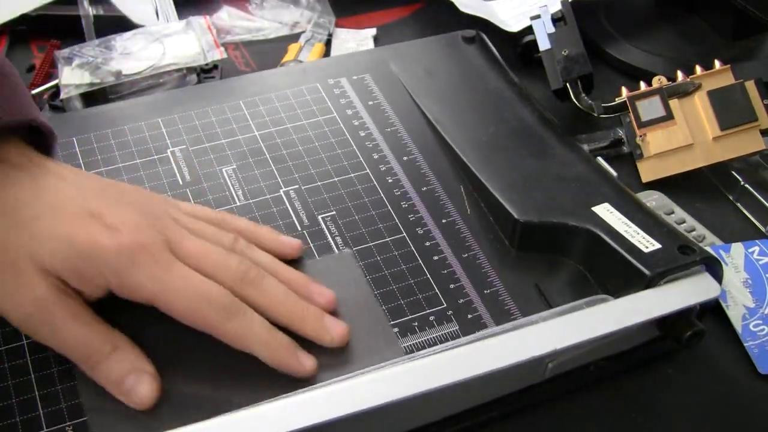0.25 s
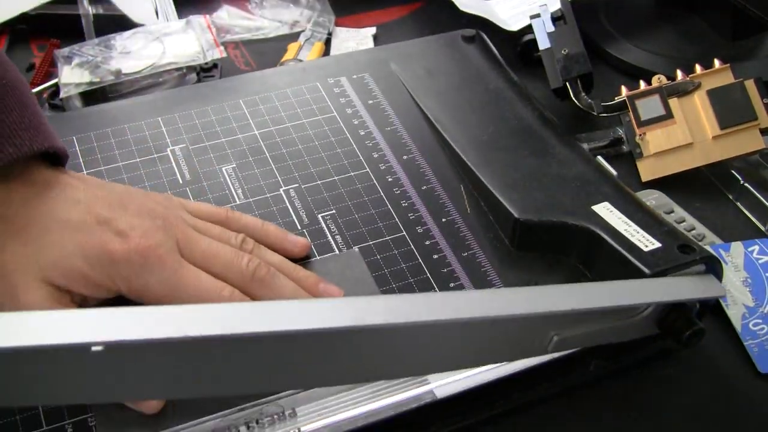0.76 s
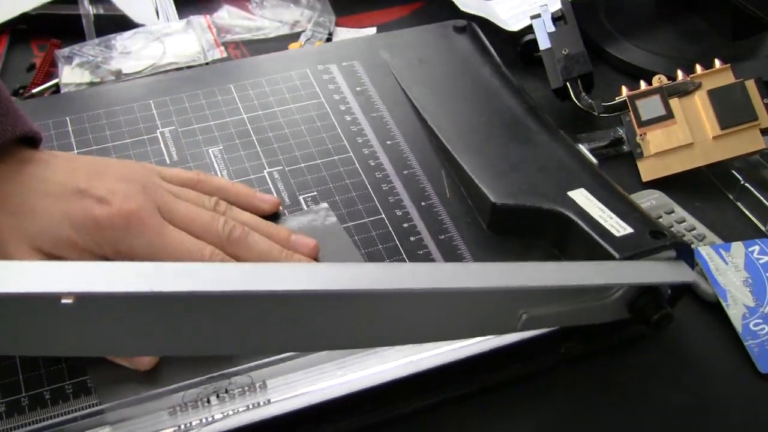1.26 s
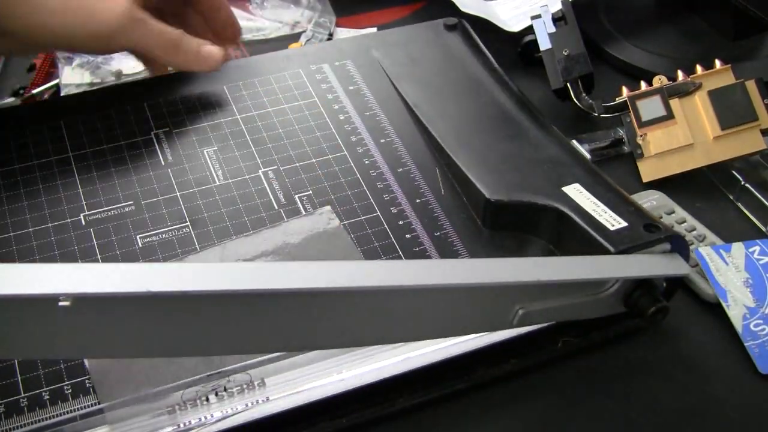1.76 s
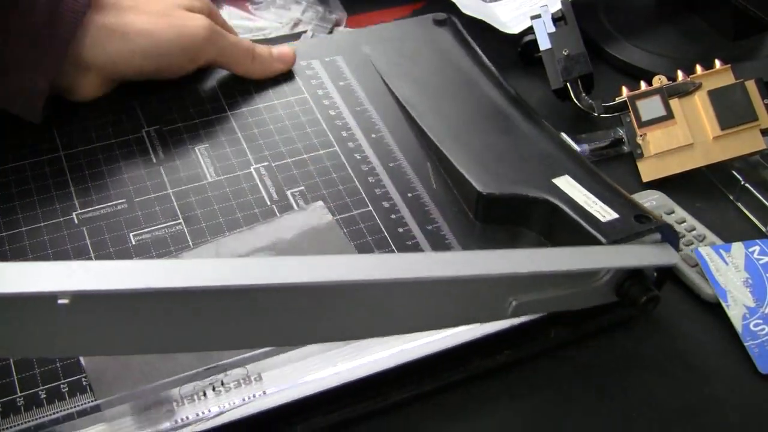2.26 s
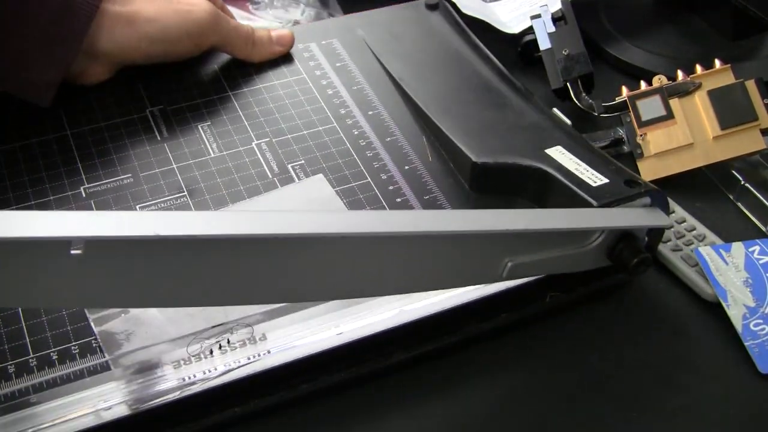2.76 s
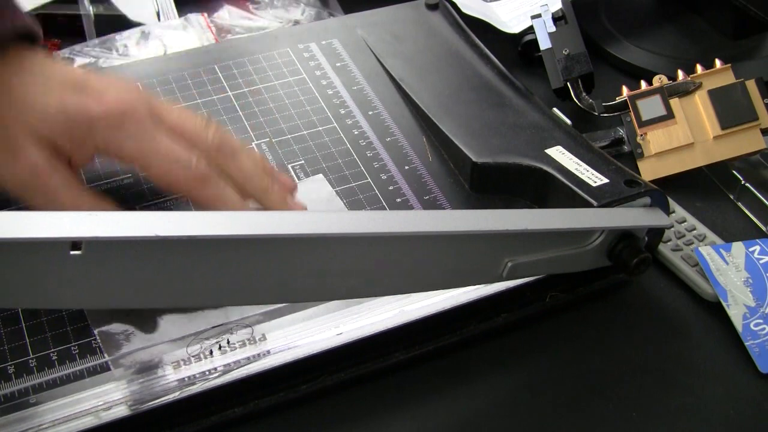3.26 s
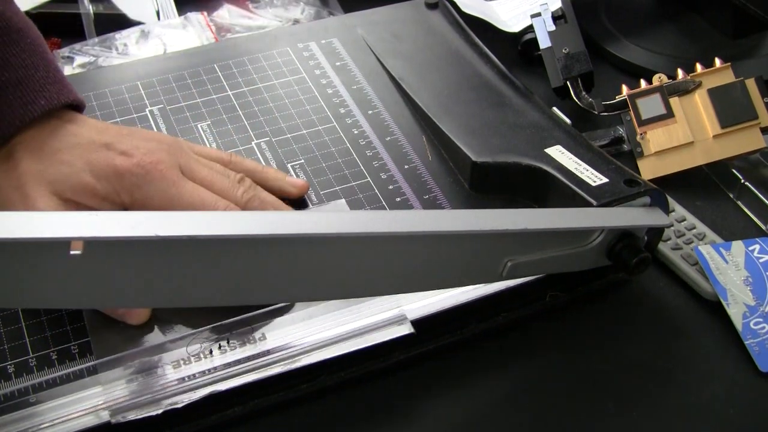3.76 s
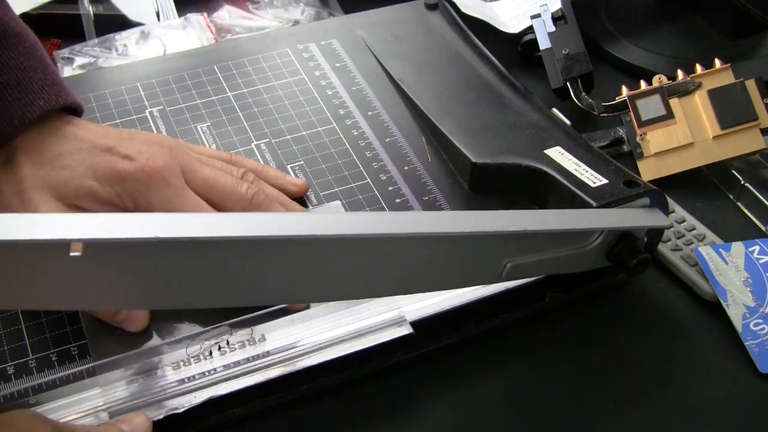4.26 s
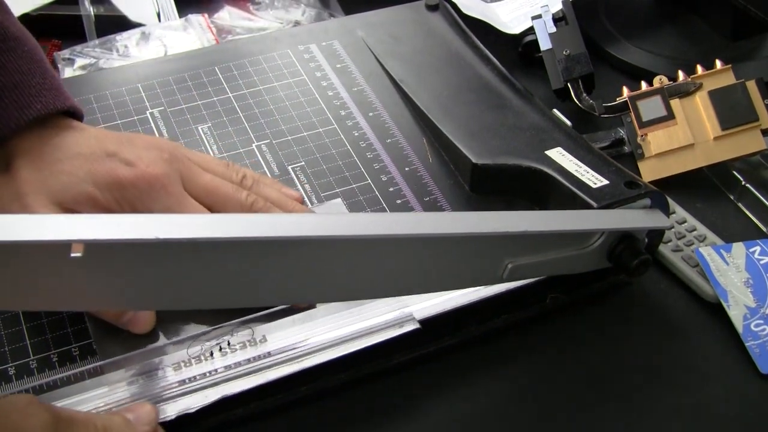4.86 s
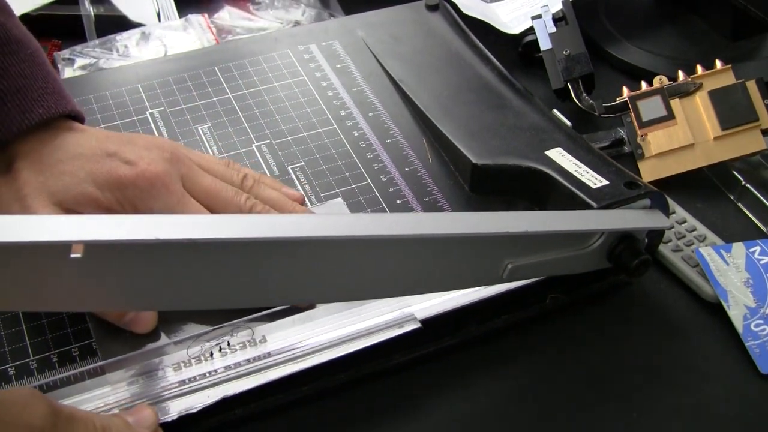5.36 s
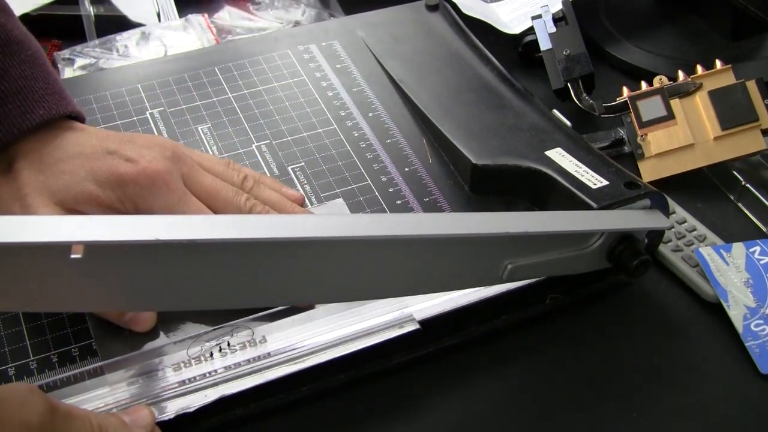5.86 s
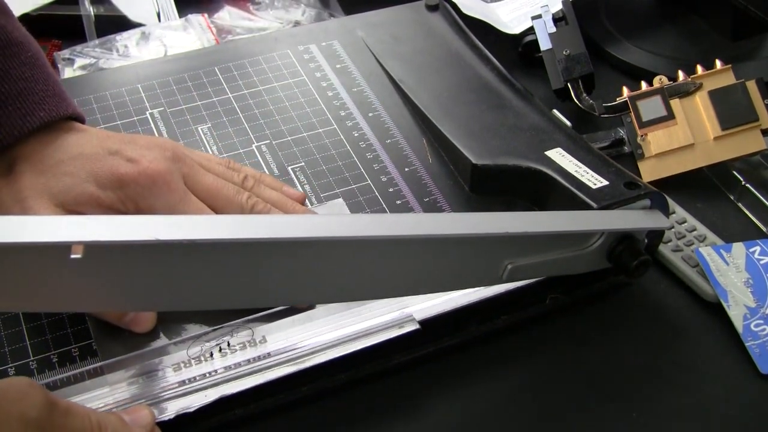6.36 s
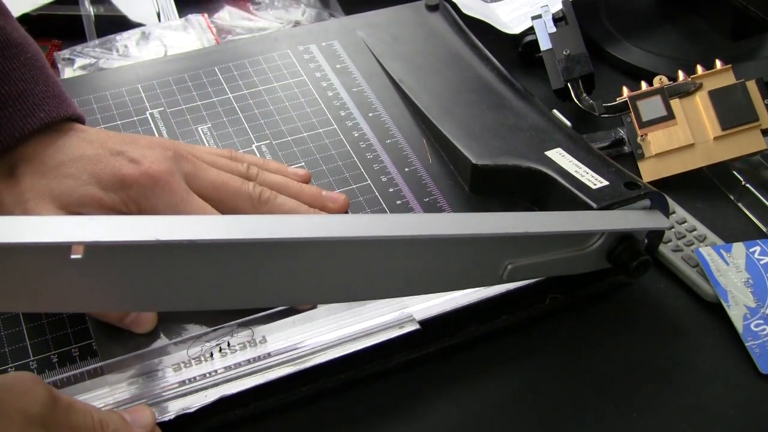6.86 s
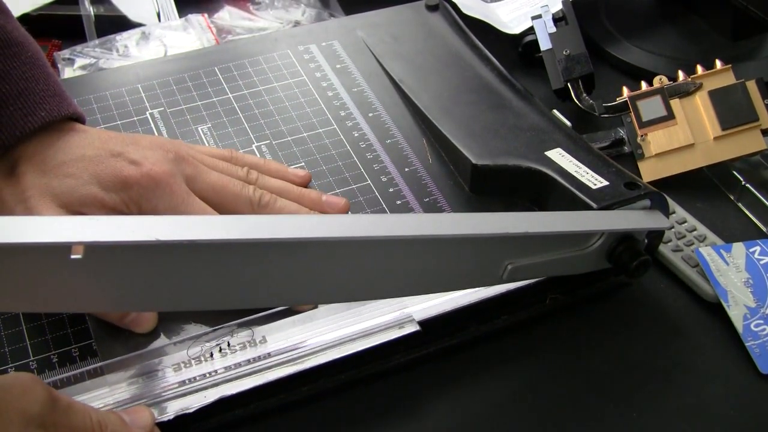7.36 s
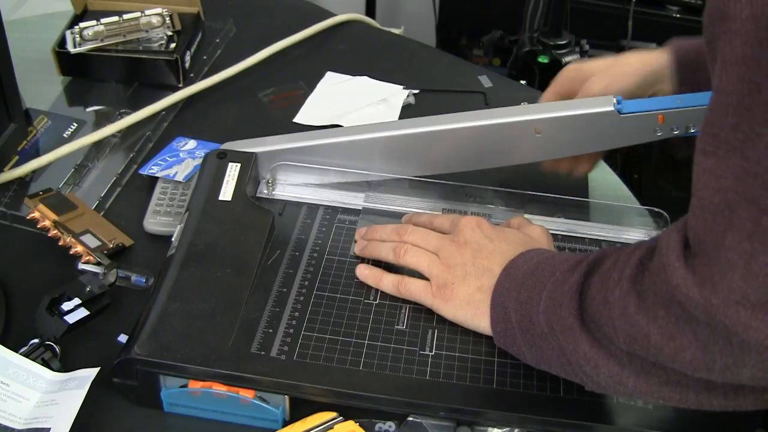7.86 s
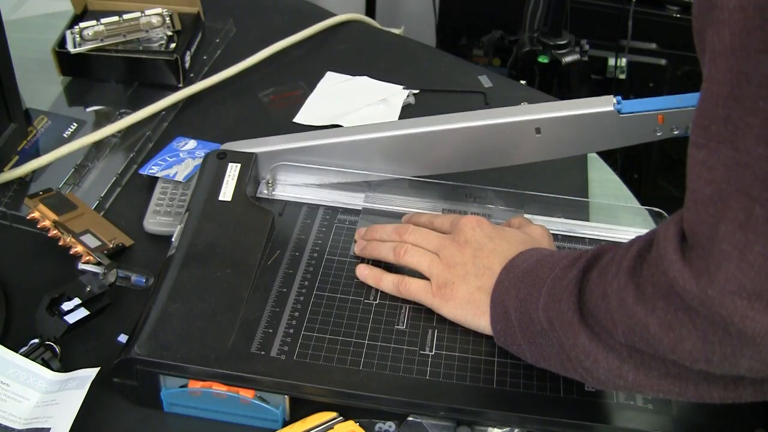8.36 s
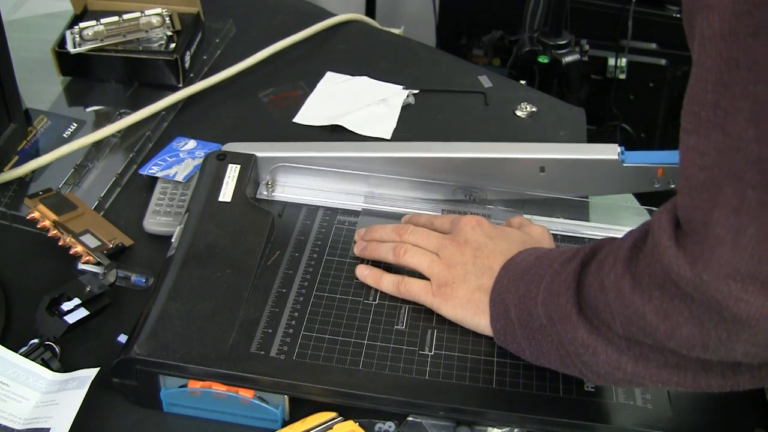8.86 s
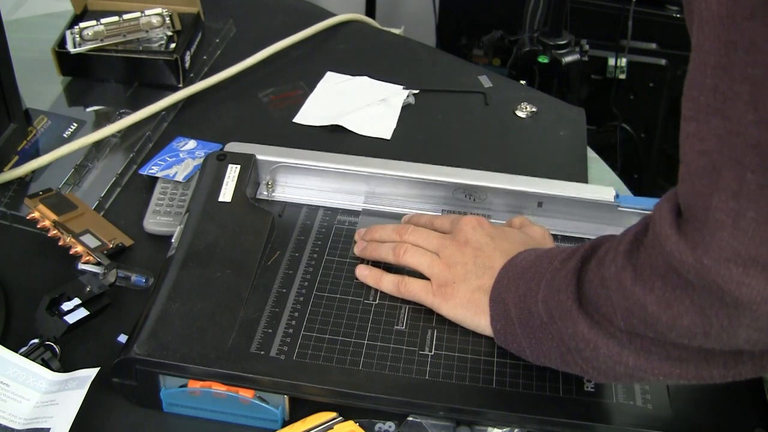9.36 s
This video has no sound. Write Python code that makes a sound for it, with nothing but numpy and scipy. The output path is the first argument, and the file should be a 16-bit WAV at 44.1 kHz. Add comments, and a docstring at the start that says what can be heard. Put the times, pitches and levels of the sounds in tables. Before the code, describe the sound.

Irregular boxy thuds, short rubbing slides and bright clicks come from a paper trimmer being set up on a workbench, heard closely with a short room tail. The steel arm scrapes and clacks. Several seconds of almost nothing follow, just low mains buzz and steady soft hiss. A few light knocks precede the blade crunching through the pad, ending with a rumbling scrape.

```python
"""Knocks, sliding and the clacks of a steel arm, a quiet spell, then a crunching cut and a final scrape.
A hand slides a soft pad onto a lever-arm paper trimmer, knocks its plastic deck and shifts the machine.
Blows ring the modes of deck and arm; sliding and cutting are crowds of tiny random slips, coloured by
the parts they shake. Mains hum, buzz and a steady hiss run underneath, in a small dry room."""
import sys
import numpy as np
from scipy import signal
from scipy.fft import rfft, irfft, next_fast_len
from scipy.io import wavfile

SR = 44100
rng = np.random.default_rng(int(sys.argv[2]) if len(sys.argv) > 2 else 0)


def unload_audio(sound):
    """Save the sound as a 16-bit wav file, at the path given as the first command line argument."""
    columns = np.transpose(np.atleast_2d(sound))
    # keep every value between -1 and 1, then stretch to whole-number steps
    steps = np.round(np.clip(columns, -1, 1) * 32767)
    wavfile.write(sys.argv[1], SR, steps.astype(np.int16))


N = 423801
T = np.arange(N) / SR  # time [s]
AGE = T[:SR // 2]  # time since a blow [s]

# All levels in the tables are relative: each sound is scaled again when it is mixed.
# ringing modes of the hollow plastic deck: (frequency [Hz], level [dB], time to fall 60 dB [s])
DECK_MODES = [(131.5, -12.5, 0.18), (218, -29.5, 0.082), (280, -3.5, 0.092), (323.4, 2.5, 0.035),
              (404, 5, 0.071), (487, -17, 0.065), (512.6, 3, 0.07), (577.5, -1.5, 0.051),
              (697, -8.5, 0.099), (811, -8, 0.0595), (987, -13, 0.054), (1105, -19.5, 0.1),
              (1353, -20, 0.046)]
# low resonances of the loaded blade: (frequency [Hz], width [Hz], level [dB])
BLADE_DRONE = [(594.5, 26, 1), (645, 22.3, 2), (735, 78, -2.5), (847, 33, 2), (994, 47, -4), (1170, 80, -6),
               (1254, 69, -9.5)]
# colour of the body shaken by steel or by the cut: (frequency [Hz], level [dB])
CRUNCH_COLOUR = [(50, -29), (90, -35.5), (130, -11), (172, -23.5), (222, -7), (250, -13), (292, -6),
                 (340, -14.5), (410, -1.5), (475, -1), (625, -13), (900, -17.5), (3000, -63.5)]
# colour of rubbing on a surface: (frequency [Hz], level [dB])
RASP_COLOUR = [(400, -8), (1100, 7), (1700, 5), (2600, 2), (3700, 0.5), (4600, -10), (6500, -25),
               (14000, -39)]
# bites of the blade into the pad, each lasting until the next: (time [s], shake of the deck [dB])
BITES = [(9.083, -7), (9.143, -8.5), (9.224, -10)]
CUT_END_S = 9.392


def amp(db):
    """Turn decibels into a gain."""
    return 10 ** (np.asarray(db) / 20)


def unit(x):
    """Scale to an rms (average strength) of 1."""
    return x / np.sqrt(np.mean(x ** 2) + 1e-20)


def along(points, hz):
    """Read a curve of (frequency [Hz], value) points on a log frequency axis."""
    f, v = np.transpose(points)
    return np.interp(np.log(hz + 1), np.log(f + 1), v)


def filtered(x, response):
    """Multiply the spectrum of x by a response, which is a function of frequency."""
    m = next_fast_len(len(x) + SR // 4)  # spare room for the filter to ring out
    spectrum = rfft(x, m) * response(np.fft.rfftfreq(m, 1 / SR))
    return irfft(spectrum, m)[:len(x)]


def coloured(x, spectrum):
    """Give x a colour, a curve of (frequency [Hz], level [dB]), at rms 1."""
    return unit(filtered(x, lambda hz: amp(along(spectrum, hz))))


def resonant(x, peaks):
    """Send x through (frequency [Hz], width [Hz], level [dB]) resonances, at rms 1."""
    def response(f):
        total = 0
        for k, (centre, width, db) in enumerate(peaks):
            damping = 1j * f * width
            sign = (-1) ** k  # neighbours have opposite signs
            total = total + sign * amp(db) * damping / (centre * centre - f * f + damping)
        return total
    return unit(filtered(x, response))


def without_bass(x, corner_hz):
    """Take away the deepest bass, below corner_hz."""
    return signal.sosfilt(signal.butter(4, corner_hz, "highpass", fs=SR, output="sos"), x)


def blow(x, size=660):
    """Scale a blow so that its first moments (size samples) have rms 1."""
    return x / np.sqrt(np.mean(x[:size] ** 2) + 1e-20)


def ring(modes, scatter_db, attack):
    """A struck body sounds as fading sine modes; each blow excites them a little differently."""
    hz, db, t60 = np.transpose(modes)[:, :, None]
    level = amp(db + scatter_db * rng.standard_normal(hz.shape) - 60 * AGE / t60)
    waves = np.sin(2 * np.pi * (hz * AGE + rng.random(hz.shape)))
    onset = 1 - np.exp(-AGE / attack)
    return blow((level * waves).sum(0) * onset)


def burst(spectrum, t60):
    """Crowded small modes that die together sound like a fading puff of coloured noise."""
    return blow(coloured(rng.standard_normal(len(AGE)), spectrum) * amp(-60 * AGE / t60))


def add(track, s, x):
    """Mix x into the track at time s."""
    part = track[round(s * SR):][:len(x)]
    part += x[:len(part)]  # a view, so the track itself changes


def grains(rate, spread_db):
    """Tiny slips at random moments, rate times a second on average, of widely varying size."""
    happens = rng.random(N) < rate / SR
    direction = rng.choice([-1, 1], N)
    size = amp(spread_db * np.clip(rng.standard_normal(N), -2, 2))
    return unit(happens * direction * size)


def clumps(rate, depth_db):
    """A jerky gain: the material holds and gives way by turns, with rate random levels a second."""
    knots = np.clip(rng.standard_normal(int(N * rate / SR) + 2), -2, 2)
    return unit(amp(depth_db * np.interp(T * rate, np.arange(len(knots)), knots)))


def smeared(x, t60):
    """Waves crossing the plates spread each slip over a few milliseconds, without changing its colour."""
    paths = rfft(rng.standard_normal(len(AGE)) * amp(-60 * AGE / t60))
    flat = paths / (np.abs(paths) + 1e-12)  # keep only the delays: every frequency equally loud
    spread = np.fft.fftshift(irfft(flat))
    return signal.fftconvolve(x, spread, mode="same")


def friction(gains, spectrum, resonances, rasp_colour, rate, spread_db, deck_db, ring_db, rasp_db, hiss_db):
    """Slips shake the body and its resonances, rasp on the surface and hiss."""
    # colour of the hiss: (frequency [Hz], level [dB])
    hiss_colour = [(2000, -8), (5000, 4), (7500, -1), (10500, -6.5), (15500, -17)]
    deck, rasp, hiss = gains
    slips = grains(rate, spread_db)
    surface = smeared(slips * clumps(rate=83, depth_db=1.0), t60=0.01)
    shaking = amp(deck_db) * coloured(slips, spectrum)
    ringing = amp(ring_db) * resonant(grains(rate, spread_db), resonances)
    rasping = amp(rasp_db) * rasp * coloured(surface, rasp_colour)
    hissing = amp(hiss_db) * hiss * coloured(surface, hiss_colour)
    return deck * (shaking + ringing) + rasping + hissing


def hum(mains_hz=60.016, ring_hz=4400, ring_life=0.00074):
    """Mains hum with a sharp edge every half cycle; each edge sets off a short sizzle."""
    # parts of the hum, mostly odd multiples: (multiple of the mains frequency, level [dB])
    multiples = [(1, 2.5), (3, -1), (5, -9.5), (7, -13), (9, -10.5), (10, -19.5), (11, -14.5), (13, -28),
                 (15, -18), (17, -18), (19, -26.5), (21, -22), (23, -20), (25, -25.5), (29, -22), (31, -24)]
    cycle = mains_hz * T - 0.31
    lines = sum(amp(db) * np.sin(2 * np.pi * k * cycle) for k, db in multiples)
    since = (cycle % 0.5) / mains_hz  # time since the last edge [s]
    swell = since / ring_life * np.exp(-since / ring_life)
    polarity = np.sign(np.sin(2 * np.pi * cycle))
    sizzle = unit(polarity * swell * np.sin(2 * np.pi * ring_hz * since))
    fizz_colour = [(2500, -12.5), (4500, -4), (7000, -26.0)]  # (frequency [Hz], level [dB])
    fizz = unit(swell * coloured(rng.standard_normal(N), fizz_colour))
    return amp(-54.0) * lines + amp(-74) * sizzle + amp(-74.0) * fizz


def steady_hiss():
    """Constant quiet noise, strongest in the bass."""
    # colour of the noise: (frequency [Hz], level [dB])
    noise_colour = [(20, 3), (45, 3.5), (90, 1.5), (200, -1.5), (500, -6), (1000, -12.5), (2500, -14),
                    (4500, -16.5), (8000, -19), (15500, -23)]
    return amp(-60.5) * coloured(rng.standard_normal(N), noise_colour)


def struck_deck(thud_db, brighten):
    """A lighter knock is a shorter contact: it favours the deck's higher modes."""
    slope = -brighten * (thud_db + 6.0)  # dB an octave
    return [(hz, db + slope * np.log2(hz), t60) for hz, db, t60 in DECK_MODES]


def knocks():
    """Each knock rings the deck; harder contacts add clatter and a ring of the spot struck."""
    # knocks on the deck:
    # (time [s], strength [dB], hardness = clatter over thud [dB], ring of the spot struck [Hz])
    hits = [(0.216, -47, -1.5, 3370), (0.364, -30, -12, 1060), (0.408, -29.5, -12, 1740),
            (0.775, -39.5, -8.5, 1280), (0.865, -23, -10, 3250), (0.887, -20.5, -11.5, 2365),
            (0.929, -14.5, -34, 1060), (0.943, -7.5, -33, 1000), (1.171, -35.5, -15, 1050),
            (1.337, -23.5, -34, 1010), (1.377, -1.5, -25.5, 945), (1.396, -29, -1.5, 1010),
            (1.477, -22, -17.5, 1550), (1.561, -13.5, -33, 1040), (1.644, -27.5, -39, 1160),
            (1.715, -22.5, -27, 1140), (1.913, -18, -10, 1420), (1.933, -11.5, -11, 1430),
            (2.15, -26, -1.5, 1070), (2.359, -43.5, 9.5, 1590), (2.698, -1, -20, 815),
            (2.706, -12, -25, 1240), (2.968, -29, -13, 1210), (3.383, -36, -9, 1140),
            (3.496, -43, -20, 1100), (4.102, -37.5, -9, 1210), (4.263, -44.5, -4, 3680),
            (4.378, -43.5, -0.5, 3180), (7.403, -53.5, -4, 3423), (7.903, -46.5, 2.5, 3210),
            (8.251, -33.5, -17, 1090), (8.314, -23.5, -13, 1000), (8.449, -30.5, -8, 1450),
            (8.544, -27.5, -12, 1800), (8.581, -40, -4.5, 1210), (8.935, -33, -4.5, 1150),
            (9.039, -12.5, -36, 1070), (9.142, -4, -10, 1060), (9.227, -7.5, -16.5, 1634),
            (9.248, -8, -27, 1440)]
    # colour of the clatter: (frequency [Hz], level [dB])
    clatter_colour = [(300, -6), (800, 6), (1500, 2.5), (2600, -2.5), (3500, -2), (4300, -12), (5200, -24),
                      (8000, -35), (15000, -56.5)]
    out = np.zeros(N)
    for s, thud_db, hardness_db, spot_hz in hits:
        modes = struck_deck(thud_db, brighten=0.047)
        thud = amp(thud_db - 9.0) * ring(modes, scatter_db=0.5, attack=0.0013)
        spot_noise = resonant(rng.standard_normal(len(AGE)), [(spot_hz, 140, 0)])
        spot = blow(spot_noise * amp(-60 * AGE / 0.083))
        clatter = amp(-4.5) * burst(clatter_colour, t60=0.084) + amp(-8.5) * spot
        contact = amp(thud_db + hardness_db) * clatter
        add(out, s, thud + contact * (1 - np.exp(-AGE / 0.00072)))
    return without_bass(out, corner_hz=70)


def stroke_gains():
    """Each stroke of the hand speeds up and slows in one arch; grit makes it brighter."""
    # slides of hand and pad: (start [s], length [s], level [dB], grit = rasp over deck [dB])
    slides = [(0.271, 0.12, -46.5, 0), (0.369, 0.14, -36, -17), (0.86, 0.19, -38.5, -11),
              (0.892, 0.2, -29.5, -19), (1.114, 0.32, -48, -9.5), (1.316, 0.14, -32.5, -19.5),
              (1.42, 0.15, -47.5, -6), (1.541, 0.16, -36.5, -20.5), (1.724, 0.097, -39.5, -21),
              (1.889, 0.12, -31.5, -6), (2.005, 0.15, -40.5, -7), (2.131, 0.1, -29, -12),
              (2.22, 0.67, -48.5, -7.5), (2.357, 0.074, -63.5, 10), (2.415, 0.086, -44.5, -28),
              (2.514, 0.062, -46.5, -6), (2.929, 0.15, -43, -9), (3.353, 0.14, -49.5, -3),
              (3.42, 0.69, -59.5, -1), (4.345, 0.11, -54.5, 0.5), (4.398, 0.34, -56.5, -7),
              (6.475, 0.1, -44, -7.5), (8.422, 0.1, -42.5, -16), (8.521, 0.047, -42.5, -13)]
    rise, roundness = 0.26, 1.54  # share of a stroke spent speeding up; exponent of its arch
    grit_share = np.array([[0], [1], [1.4]])  # dB for each dB of grit, in deck, rasp and hiss
    total = np.zeros((3, N))
    for start, length, db, grit_db in slides:
        progress = np.interp(T, start + length * np.array([0, rise, 1]), [0, 0.5, 1])
        speed = (4 * progress * (1 - progress)) ** roundness
        total += amp(db + grit_db * grit_share) * speed
    return total


def hand():
    """Hand and pad slide over the deck: their slips rub, rasp and ring the plastic."""
    # colour of the rubbed deck: (frequency [Hz], level [dB])
    rub_colour = [(50, -11), (90, -44), (125, 13), (165, -11.5), (215, 3.5), (330, -6.5), (410, 9),
                  (490, 5), (610, -5.5), (830, -5.5), (1130, -17.5), (1600, -18), (3500, -71)]
    # a mode's width follows from its decay
    plastic = [(hz, np.log(1000) / np.pi / t60, db) for hz, db, t60 in DECK_MODES]
    return friction(stroke_gains(), rub_colour, plastic, RASP_COLOUR, rate=1500, spread_db=6,
                    deck_db=-3, ring_db=-7.5, rasp_db=-2.5, hiss_db=-8)


def swing_gains():
    """The hinge breaks loose, swells with the arm's speed and dies away."""
    # one row each for deck, rasp and hiss: (level when fastest [dB], rise [dB per s], fall [dB per s])
    swells = [(-9, 168, 266), (-24.5, 158, 265), (-32, 234, 384)]
    start_s, fastest_s, attack_s = 0.4748, 0.57, 0.014
    loose = np.clip((T - start_s) / attack_s, 0, 1)
    late = T - fastest_s
    return [loose * amp(db + np.minimum(rise * late, -fall * late)) for db, rise, fall in swells]


def swing():
    """The arm swings up: slips in its hinge give a short grinding scrape."""
    # colour of the grinding: (frequency [Hz], level [dB])
    grind_colour = [(400, -28), (1100, 2.5), (2000, -2.5), (2700, -5), (3200, 0), (3850, -1.5),
                    (4400, -12.5), (5800, -21), (8000, -19.5), (11000, -54)]
    return friction(swing_gains(), CRUNCH_COLOUR, BLADE_DRONE, grind_colour, rate=2500, spread_db=6.5,
                    deck_db=-1.5, ring_db=-11.5, rasp_db=0.5, hiss_db=-3)


def clicks():
    """Small hard contacts of plastic and steel: a short bright snap."""
    # tiny dry clicks: (time [s], level [dB])
    contacts = [(0.523, -17.5), (0.6161, -44), (1.9877, -29.5), (1.9983, -23), (2.0921, -50.5),
                (2.389, -33.5), (2.4389, -36), (2.487, -45.5), (8.6153, -48), (8.9351, -38), (9.045, -30.5),
                (9.1424, -11.5)]
    out = np.zeros(N)
    # (frequency [Hz], level [dB])
    snap = [(400, -26), (1300, 3), (3000, 10), (6000, -5.5), (9000, -2.5), (15000, -16.0)]
    for s, db in contacts:
        add(out, s, amp(db - 15.5) * burst(snap, t60=0.023))
    return out


def clacks():
    """The jolted steel arm rings briefly under a bright crack."""
    # jolts of the arm: (time [s], level [dB])
    jolts = [(0.5498, -15), (2.2049, -3), (2.2137, -9.5), (2.221, -14.5), (9.0844, -11), (9.1002, -7.5),
             (9.181, -8.5), (9.2313, -29)]
    # ringing modes of the arm: (frequency [Hz], level [dB], time to fall 60 dB [s])
    arm_modes = [(464, 4.5, 0.063), (940, -19.5, 0.75), (1042, 0.5, 0.1), (1350, -11, 0.072),
                 (2060, -4.5, 0.047), (2305, 1.5, 0.054), (3300, -1, 0.0885), (3640, 1.5, 0.076),
                 (3840, -9, 0.14), (4050, -0.5, 0.05), (5154, -16, 0.097), (8350, -23, .1)]
    out = np.zeros(N)
    # (frequency [Hz], level [dB])
    crack = [(300, -23), (600, -6.0), (2000, -2.5), (4000, -2),
             (5000, -8.5), (6500, -11), (9000, -20.5), (15000, -50)]
    for s, db in jolts:
        steel = amp(db - 14.5) * ring(arm_modes, scatter_db=0.5, attack=0.000384)
        add(out, s, steel + amp(db - 15) * burst(crack, t60=0.069))
    return out


def bumps():
    """Soft bumps give only a dull push; the last two are the low rumble under the final scrape."""
    # dull pushes, the last two being the scrape's low rumble: (time [s], level [dB])
    pushes = [(1.069, -37), (1.442, -49), (5.207, -50), (6.514, -35), (6.549, -45), (9.454, -23.5),
              (9.491, -23)]
    out = np.zeros(N)
    # (frequency [Hz], level [dB])
    dull = [(40, 0), (110, -7), (240, 12.5), (330, -2), (700, -59), (2000, -80)]
    for s, db in pushes:
        push = burst(dull, t60=0.1) * (1 - np.exp(-AGE / 0.0027))
        add(out, s, amp(db - 4.0) * push)
    return out


def on_pad():
    """1 while the blade is in the pad, with a sharp entry and a softer exit."""
    attack_s, release_s = 0.003, 0.023
    entry = (T - BITES[0][0]) / attack_s
    leaving = (CUT_END_S - T) / release_s
    return np.clip(np.minimum(entry, leaving), 0, 1)


def scrape_gains():
    """Deck, rasp and hiss all follow the pressure; the pad parts the edges while it is cut."""
    # blade on the cutting edge, one list before the pad and one after: (time [s], pressure [dB])
    presses = [
        [(8.6, -48.5), (8.642, -55.5), (8.916, -43.5), (8.964, -32), (9.03, -37)],
        [(9.385, -22), (9.543, -29.5), (9.573, -53), (9.61, -35.5)],
    ]
    s, db = np.concatenate(presses).T
    return [np.interp(T, s, amp(db), left=0) * (1 - on_pad())] * 3


def scrape():
    """Steel slides on steel: the slips shake the deck and make the loaded blade drone."""
    return friction(scrape_gains(), CRUNCH_COLOUR, BLADE_DRONE, RASP_COLOUR, rate=2000, spread_db=4,
                    deck_db=-1.0, ring_db=-11, rasp_db=-14.5, hiss_db=-36)


def cut_gains():
    """Each bite shakes the deck and then sags; the blade drones evenly and the tearing barely eases."""
    bite_sag_db, tear_sag_db = 10, 2  # fall over one bite
    drone_db, tear_db = -16, -19
    starts, deck_db = np.transpose(BITES)
    bite = np.clip(np.searchsorted(starts, T) - 1, 0, len(starts) - 1)
    bites_done = np.interp(T, np.append(starts, CUT_END_S), np.arange(len(starts) + 1))
    progress = bites_done - bite  # from 0 to 1 within each bite
    levels = deck_db[bite] - bite_sag_db * progress, drone_db, tear_db - tear_sag_db * progress
    return [on_pad() * amp(db) for db in levels]


def cut():
    """The pad gives way in a dense, jerky run of small ruptures that shake deck and blade."""
    # colour of the tearing pad: (frequency [Hz], level [dB])
    tear_colour = [(500, -29), (1100, -2), (1800, 2), (2700, -5), (3700, 2), (5200, -9), (8000, -17),
                   (10200, -16.5), (13000, -28), (15800, -50)]
    # high resonances of the loaded blade: (frequency [Hz], width [Hz], level [dB])
    blade_peaks = [(1377, 26, -5.5), (1580, 32, 9), (1760, 100, -7.5), (1985, 50, 7), (2380, 70, -8.5),
                   (2970, 140, 3.5), (3450, 71, -7), (3560, 85, 2.5), (4240, 42, -4), (4270, 51, -4)]
    force, drone, tearing = cut_gains()
    ruptures = grains(rate=2500, spread_db=4.5) * clumps(rate=110, depth_db=1.5)
    fibres = smeared(ruptures, t60=0.014)
    edge = amp(-3.5) * coloured(fibres, tear_colour) + amp(-2.5) * resonant(fibres, blade_peaks)
    body = amp(-4.0) * force * coloured(grains(rate=4000, spread_db=3.5), CRUNCH_COLOUR)
    return body + amp(-3.5) * drone * resonant(fibres, BLADE_DRONE) + tearing * edge


def room(x):
    """Bench and walls answer with a short tail of noise that fades at its own pace in each band."""
    # decay of the room: (frequency [Hz], time to fall 60 dB [s])
    decay = [(100, 0.4), (400, 0.18), (2000, .22), (5000, 0.15), (14000, 0.12)]
    hz, t, z = signal.stft(rng.standard_normal(SR // 2), SR, nperseg=256)
    fade = amp(-60 * t / along(decay, hz)[:, None])
    tail = signal.istft(z * fade, SR, nperseg=256)[1]
    delay = np.zeros(SR // 250)  # 4 ms
    return signal.fftconvolve(x, np.concatenate([delay, tail / np.linalg.norm(tail)]))[:N]


def scene():
    """The trimmer in its room, over hum and hiss."""
    blows = knocks() + clicks() + clacks() + bumps()
    trimmer = blows + hand() + swing() + scrape() + cut()
    return (trimmer + amp(-11.5) * room(trimmer) + hum() + steady_hiss())[None]


def record(dry):
    """Round off the loudest peaks, drop the sound out for an instant and remove the highest treble."""
    # the dropout: (start [s], end [s])
    gap_start, gap_end = (7.619, 7.640)
    ceiling, top_hz = 0.96, 15850
    live = (T < gap_start) | (T > gap_end)
    rounded = dry[0] / (1 + np.abs(dry[0] / ceiling) ** 8) ** (1 / 8)
    return filtered(rounded * live, lambda hz: hz < top_hz)[None]


dry = scene()
out = record(dry)
unload_audio(out)
```